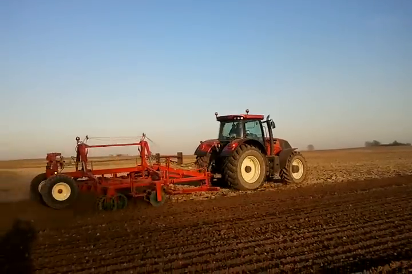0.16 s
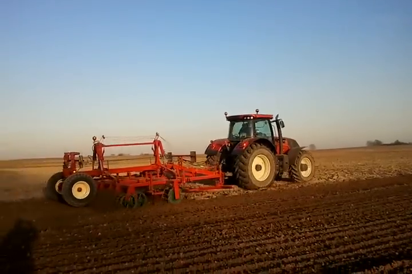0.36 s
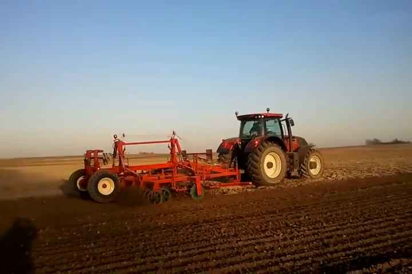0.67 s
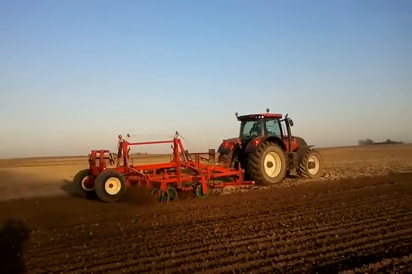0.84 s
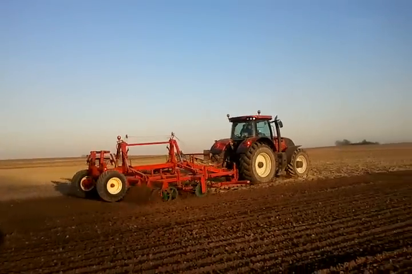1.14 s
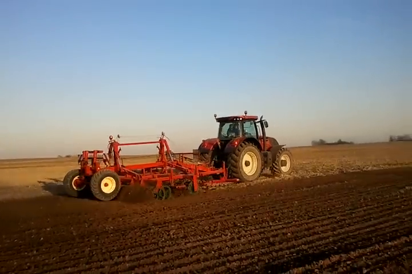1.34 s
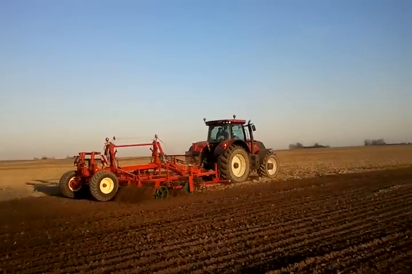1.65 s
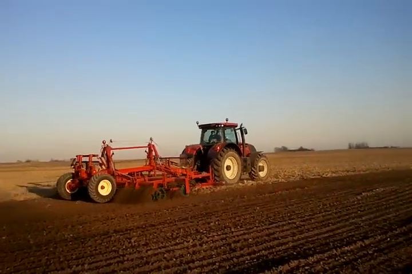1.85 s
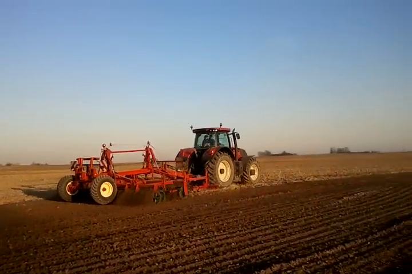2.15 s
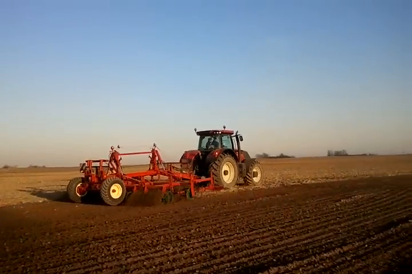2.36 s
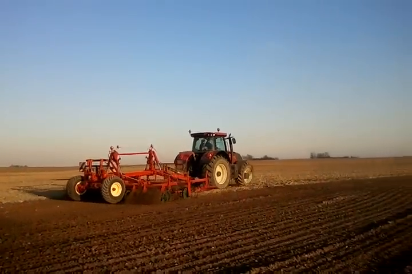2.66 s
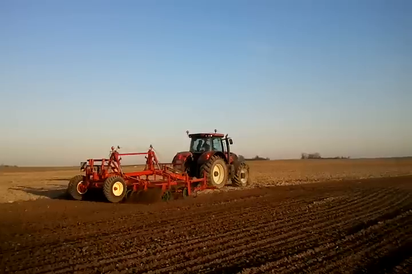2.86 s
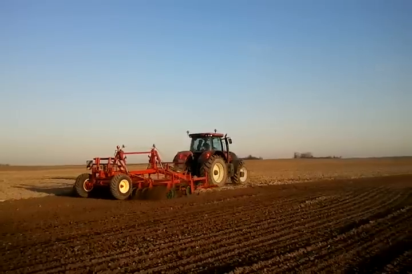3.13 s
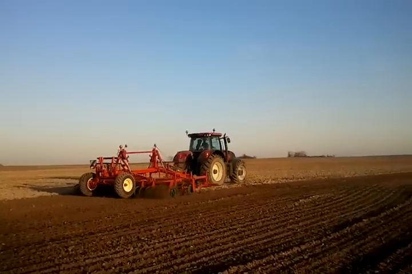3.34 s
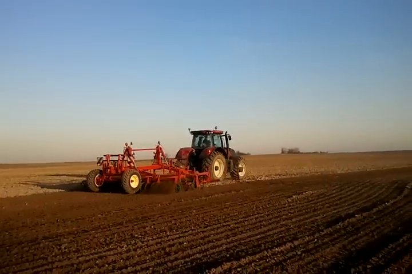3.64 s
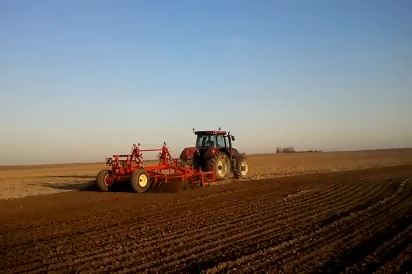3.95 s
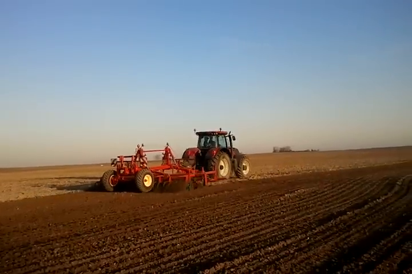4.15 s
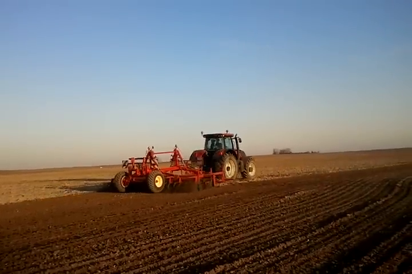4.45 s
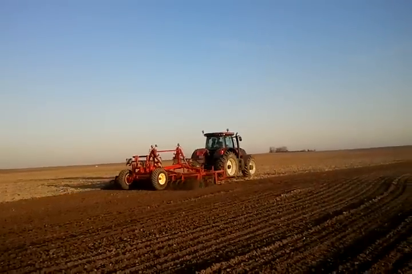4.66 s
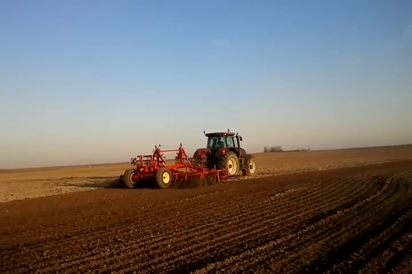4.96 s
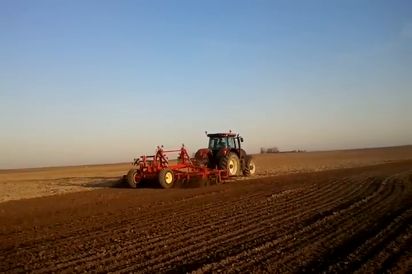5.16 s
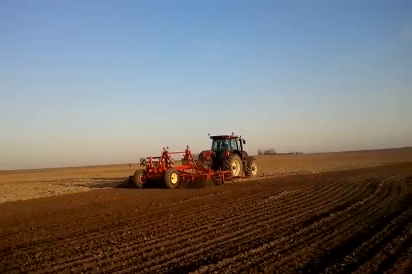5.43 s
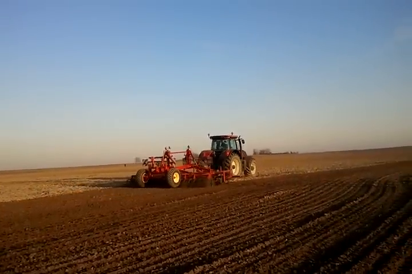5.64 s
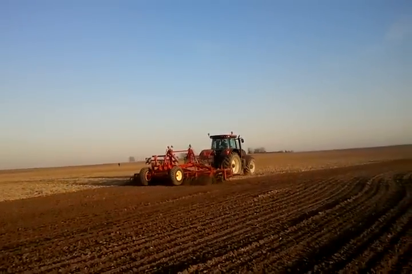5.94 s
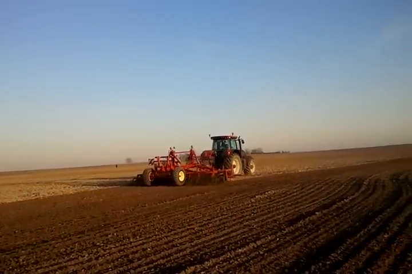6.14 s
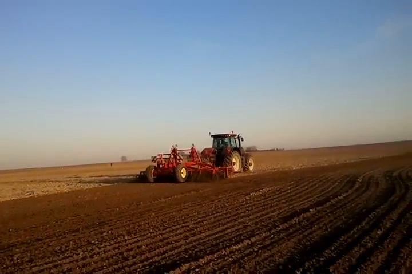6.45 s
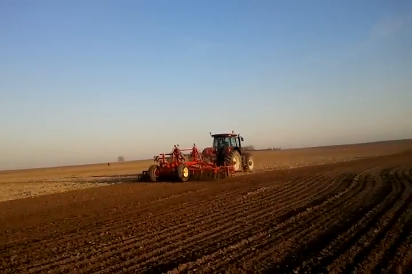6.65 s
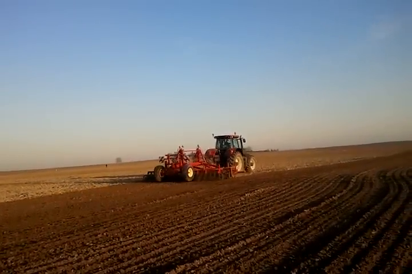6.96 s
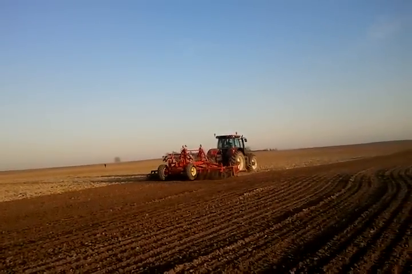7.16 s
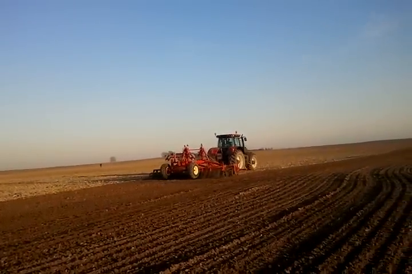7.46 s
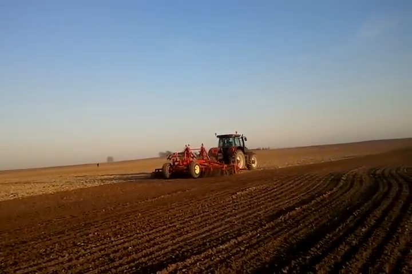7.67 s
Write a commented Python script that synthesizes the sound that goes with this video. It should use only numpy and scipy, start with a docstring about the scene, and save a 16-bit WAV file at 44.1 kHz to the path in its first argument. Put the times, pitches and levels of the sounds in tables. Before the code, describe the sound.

A diesel tractor drones and slowly moves away, dragging a clanking cultivator through soil while wind gusts buffet the microphone.

```python
"""Tractor and cultivator in wind

A six-cylinder diesel tractor drags a cultivator across a dry field and slowly draws away. Periodic
firing makes the exhaust drone and the engine knock; fan and gears hum, and the turbo whistles thinly.
Soil rushes through the tines, and impacts excite the modes of the steel frame, which clanks.
Turbulent gusts buffet the microphone and drive it into clipping."""
import sys
import numpy as np
from scipy import signal
from scipy.fft import rfft, irfft, next_fast_len
from scipy.io import wavfile
from scipy.ndimage import uniform_filter1d, map_coordinates

SR = 44100
rng = np.random.default_rng(int(sys.argv[2]) if len(sys.argv) > 2 else 0)


def master(y):
    """Save y as 16-bit WAV."""
    cut = np.clip(np.atleast_2d(y).T, -1, 1)
    pcm = np.round(cut * 32767)  # scale
    wavfile.write(sys.argv[1], SR, pcm.astype(np.int16))


N = 343970
T = np.arange(N) / SR


def undb(db):
    """Amplitude ratio of a level in decibels."""
    return 10 ** (np.asarray(db) / 20)


def unit(x):
    """Normalisation to rms 1."""
    return x / np.sqrt(np.mean(x ** 2))


def curve(table):
    """Linear interpolation of (t/s, value) points at every sample."""
    return np.interp(T, *np.transpose(table))


def colour(x, spectrum):
    """Spectral shaping by (f/Hz, level/dB) points, with a roll-off at the last point; rms 1."""
    size = next_fast_len(N)
    hz, db = np.transpose(spectrum)
    f = np.maximum(np.arange(size // 2 + 1) * SR / size, 1)
    gain = undb(np.interp(np.log(f), np.log(hz), db))
    return unit(irfft(rfft(x, size) * gain / (1 + (f / hz[-1]) ** 2), size)[:N])


def noise():
    """Gaussian white noise."""
    return rng.standard_normal(N)


def drift(rate):
    """Smooth random modulation that changes about rate times a second; rms 1."""
    steps = rng.standard_normal(4096)
    return unit(uniform_filter1d(np.interp(T * rate, np.arange(len(steps)), steps), 256))


# Gusts: t/s, duration/s, relative eddy level/dB, relative buffet level/dB
GUSTS = [(0, 0.61, -24.5, -21.5), (0.671, 0.13, -19.5, -19.5), (1.018, 0.46, -23.5, -31.5),
         (1.557, 0.31, -21.5, -27), (1.819, 0.68, -20.5, -20), (1.994, 0.203, -27.5, -17),
         (2.55, 0.24, -29.5, -37.5), (4.925, .14, -22.5, -31), (5.069, 0.12, -18.5, -25.5),
         (5.704, .14, -23, -32.5), (6.22, .24, -18.5, -31), (6.623, 0.057, -22.5, -31),
         (6.98, 0.37, -28.5, -35), (7.388, 0.23, -20.5, -28), (7.73, .07, -24.5, -36)]

def gusts(attack_s=0.031, release_s=0.017):
    """Envelopes of eddies and buffeting: each gust grows exponentially, holds and decays."""
    slow, fast = undb(-33.5), undb(-40)  # the breeze between gusts
    for s, length, slow_db, fast_db in GUSTS:
        shape = np.exp(np.minimum(T - s, 0) / attack_s - np.maximum(T - s - length, 0) / release_s)
        slow = np.maximum(slow, undb(slow_db) * shape)
        fast = np.maximum(fast, undb(fast_db) * shape)
    return slow, fast


def turbulence(spectrum, steady_s=0.075):
    """Turbulent pressure: shaped noise whose strength is even over the span of one eddy."""
    swirl = colour(noise(), spectrum)
    return swirl / np.sqrt(uniform_filter1d(swirl ** 2, int(steady_s * SR)))


# Single eddies striking the microphone: t/s, envelope peak level/dB, f/Hz
THUMPS = [(.886, -1.5, 153), (1.59, -6, 205), (1.827, -2, 110), (2.109, 2.5, 91), (2.477, 4.5, 100),
          (3.15, -20, 198), (3.302, -19, 310), (4.757, -9, 109), (5.1, -5, 202), (5.147, -0.5, 115),
          (6.305, -7, 150), (6.442, -14, 128), (6.489, -6, 133), (7.343, -10, 128), (7.413, -10.5, 250),
          (7.433, -7, 240), (7.494, -4, 160), (7.517, -2, 143), (7.588, -3, 149), (7.68, -9.5, 253)]

def thumps(cycles=0.76, steepness=0.51):
    """Pressure transients: a small eddy pushes and pulls the diaphragm, with a steep front."""
    out = np.zeros(N)
    for s, db, hz in THUMPS:
        near = np.abs(T - s) < .05
        turns = (T[near] - s) * hz
        angle = 2 * np.pi * (turns + rng.random())
        envelope = undb(db) * np.exp(-(turns / cycles) ** 2)
        out[near] += envelope * np.sin(angle + steepness * np.sin(angle))
    return out


# Spectra of slow eddies and of fast buffeting: f/Hz, relative level/dB
EDDIES = [(5, -12.5), (15, -3), (35, -4), (60, 0), (100, -3.5), (160, -21), (300, -42)]
BUFFETS = [(20, -17), (60, 0.5), (100, 2), (170, -1.5), (235, -6.5), (320, -12.5), (450, -24), (700, -29.5),
           (1500, -56)]

def wind(eddy_db=4.0, buffet_db=10, onset_db=-36):
    """Flow noise: slow eddies rock the diaphragm; a stronger flow breaks up and buffets it."""
    slow, fast = gusts()
    breakup = 1 / (1 + (undb(onset_db) / fast) ** 2)
    buffets = breakup * fast * undb(buffet_db + 2 * drift(60)) * turbulence(BUFFETS)
    eddies = slow * undb(eddy_db + 2 * drift(12)) * turbulence(EDDIES)
    return eddies + buffets + thumps()


# Stones striking a spring tine: t/s, peak level/dB, f/Hz, T60/s
PINGS = [(3.563, -22, 6970, 0.023), (5.025, -21, 2970, 0.052), (5.119, -18, 4180, .1),
         (5.156, -31, 4170, 0.14), (5.4157, -18.5, 2450, 0.063), (6.294, -21.5, 1115, 0.07),
         (7.019, -17, 3230, 0.044), (7.3752, -25, 2510, 0.12)]

def pings():
    """Damped free vibration: a flicked tine rings in one mode, which the soil quickly absorbs."""
    out = np.zeros(N)
    for s, db, hz, t60 in PINGS:
        ringing = (T >= s) & (T < s + t60)
        t = T[ringing] - s
        out[ringing] += undb(db) * np.sin(2 * np.pi * hz * t) * np.exp(-np.log(1000) * t / t60)
    return out


# Blows on the frame: t/s, relative level/dB, contact centre f/Hz, T60 of the crash/s
CLANKS = [(0.5333, -9.5, 2710, 0.046), (0.597, -4, 2530, 0.072), (0.608, -14.5, 3500, 0.12),
          (1.578, -12.5, 2310, 0.057), (1.6183, -16.5, 2070, 0.059), (1.69, -14.5, 2080, 0.1),
          (1.727, -18.5, 1710, 0.097), (2.2235, -19, 2580, 0.045), (2.342, -24.5, 3150, 0.088),
          (3.31, -21, 2000, 0.039), (4.0852, -24.5, 3600, 0.038), (4.263, -22.5, 1100, 0.12),
          (4.799, -21.5, 2300, 0.047), (4.839, -21, 2260, 0.042), (4.9086, -23.5, 1870, 0.12),
          (4.9352, -25.5, 2570, .2), (5.12, -20.5, 3600, 0.067), (5.1498, -18, 3000, 0.063),
          (5.4151, -20.5, 2291, 0.083), (6.03, -32, 4330, 0.12), (6.291, -29, 2820, 0.1),
          (6.561, -26, 1970, .08), (6.779, -24.5, 1790, 0.061), (7.019, -22, 2340, 0.065),
          (7.3749, -25, 2670, 0.055)]
# Modes of the steel frame: f/Hz, relative level/dB
FRAME_MODES = [(930, 2.5), (1206, -2.5), (1610, 1.5), (2160, 1), (2345, 1), (2590, 0.5), (2790, 2.5),
               (3010, 4), (3335, 4.5), (3410, 1.5), (3560, -7.5), (3775, 1), (4014, -4.5), (4242, -9),
               (4737, -10.5), (5500, -12), (5992, -6), (6918, -10), (7181, -6.5), (7900, -9)]

def clanks(ring_db=-6.0, crash_db=-0.5, ring_stretch=1.88, detune=0.01):
    """Impact excitation: a dense crash and longer-lived modes, coloured by the contact's hardness."""
    size = 16384
    out, t = np.zeros(N + size), np.arange(size) / SR
    f = np.maximum(np.arange(size // 2 + 1) * SR / size, 1)
    mode_hz, mode_db = np.transpose(FRAME_MODES)
    for s, db, hz, t60 in CLANKS:
        contact = (1 + np.log2(f / hz) ** 2) ** -2
        phase, shift = rng.random((2, len(FRAME_MODES), 1))
        turns = mode_hz[:, None] * (1 + detune * (shift - .5)) * t + phase
        modes = undb(mode_db) @ np.sin(2 * np.pi * turns)
        ring, crash = (unit(irfft(rfft(v) * contact)) for v in (modes, rng.standard_normal(size)))
        decay = -np.log(1000) * t / t60
        blow = undb(ring_db) * ring * np.exp(decay / ring_stretch)
        blow += undb(crash_db) * crash * np.exp(decay)
        attack_s = 0.00021 / undb(0.46 * db)  # gentle blows scrape in more slowly
        start = int(s * SR)
        out[start:start + size] += undb(db) * blow * (1 - np.exp(-t / attack_s))
    return out[:N]


# Spectrum of crumbling soil: f/Hz, relative level/dB
SOIL = [(300, -11.5), (900, 1.5), (2000, 3.5), (3300, -0.5), (4500, -4.5), (7000, -18), (9000, -15.5)]

def soil(clods_per_s=90, spread_db=5.5, crumble_s=0.0075, ring_db=-5, ring_s=.02):
    """Shot noise: clods burst on the tines at random and keep the frame's modes faintly ringing."""
    sizes = undb(spread_db * np.minimum(rng.exponential(size=N), 3))
    clods = (rng.random(N) < clods_per_s / SR) * sizes
    power = signal.lfilter([1], [1, -np.exp(-1 / (crumble_s * SR))], clods ** 2)
    crunch = colour(noise() * np.sqrt(power), SOIL)
    t = T[:SR // 10]
    frame = sum(undb(db) * np.sin(2 * np.pi * hz * t) for hz, db in FRAME_MODES) * np.exp(-t / ring_s)
    return crunch + undb(ring_db) * unit(signal.fftconvolve(crunch, frame)[:N])


def spreading_loss(speed_m_s=3.44, nearest_m=9.93, passed_ago_s=0.64):
    """Spherical spreading from a source receding in a straight line: loss in dB since the start."""
    metres = np.hypot(nearest_m, speed_m_s * (T + passed_ago_s))
    return 20 * np.log10(metres / metres[0])


# Drag of the tines: t/s, engine load as a fraction of full load
LOAD = [(0, .38), (.6, .46), (1.35, .96), (2.15, .99), (3.6, 0), (4.5, .15), (4.8, .87), (6.2, .1),
        (7.8, .7)]

def received(level_db, loss_scale, full_load_db):
    """Gains add in decibels: a base level, less a multiple of the spreading loss, plus a load term."""
    return undb(level_db - loss_scale * spreading_loss() + full_load_db * curve(LOAD))


def turbo(no_load_hz=7072, rise_hz=228):
    """Frequency modulation: the turbocharger's thin whistle rises and falls with the load."""
    turns = np.cumsum(no_load_hz + rise_hz * curve(LOAD)) / SR
    return np.sqrt(2) * undb(2 * drift(8.8)) * np.sin(2 * np.pi * turns + 0.94 * drift(27))


# Gear whine, loudest side-on: t/s, level/dB
WHINE = [(0, -26), (.4, -33.5), (1.1, -39.5), (2.6, -36), (3.6, -51), (5.7, -52), (7.8, -41)]

def transmission(firings, runout=0.71):
    """Amplitude modulation: a wheel slightly off centre adds sidebands to the gear-mesh tone."""
    mesh = np.sin(2 * np.pi * 7.69 * firings + 0.15 * drift(18))
    wheel = np.cos(2 * np.pi * 5 / 6 * firings + drift(9))
    return unit(mesh * (1 + runout * wheel)) * undb(curve(WHINE) - drift(5.4))


# Fan tones: harmonic number, relative level/dB, phase wander/rad, extra multiple of the spreading loss
FAN_TONES = [(1, 2.5, 0.2, 0), (2, -3.5, 0.89, 0.3), (3, -7, 0.6, -0.5)]

def fan(firings, blades_per_firing=6.225, waver_db=3.1):
    """Blade-passing harmonics: the fan chops the air, and its tones waver on crossing the field."""
    passes, loss_db = blades_per_firing * firings, spreading_loss()
    tones = np.zeros(N)
    for k, db, wander, loss_scale in FAN_TONES:
        gain = undb(db - loss_scale * loss_db + waver_db * drift(5.4))
        tones += gain * np.sin(2 * np.pi * k * passes + wander * drift(16))
    return unit(tones)


# Tones of belt drives, pumps and block: f/firing rate, relative level/dB, phase wander/rad
HUM = [(6.71, -17, 0.77), (8.05, -10, 0.69), (8.39, -11.5, 1), (9.01, -14, 0.59), (10.19, -17, 0.41),
       (15.75, -15, 0.82), (25.7, -24.5, 1)]
# Rumble spectrum of block and tyres: f/Hz, relative level/dB
RUMBLE_SPECTRUM = [(30, -13), (70, 2), (120, 13), (185, 12.5), (225, -1.5), (275, -7.5), (390, 3), (500, 3),
                   (600, 5), (750, -9), (1000, -3), (1500, -31), (3000, -34)]

def machinery(firings, waver_db=3.5, hum_db=-0.5, rumble_db=3.5):
    """Lines on a continuous spectrum: accessory tones, shaken by moving air, over a low rumble."""
    hum = np.zeros(N)
    for k, db, wander in HUM:
        gain = undb(db + waver_db * drift(5))
        hum += gain * np.sin(2 * np.pi * k * firings + wander * drift(14))
    return undb(hum_db) * hum + undb(rumble_db) * colour(noise(), RUMBLE_SPECTRUM)


# Spectrum of combustion knock: f/Hz, relative level/dB
KNOCK_SPECTRUM = [(300, -17), (700, -3.5), (1000, -3), (1500, -4), (2100, 1), (2700, 0), (3450, -2.5),
                  (3750, -8), (5000, -12), (6300, -12.5), (7100, -16), (9000, -16)]

def knock(firings, depth=0.28, decay_firings=0.22, uneven=0.53, rattle_gain=0.69):
    """Cyclostationary noise: a burst at each firing; valves and injectors repeat every two turns."""
    cylinders = 1 + uneven * (np.cos(np.pi * firings) + np.cos(2 * np.pi * firings / 3))
    bursts = 1 + depth * cylinders * np.exp(-(firings % 1) / decay_firings)
    pattern = rng.standard_normal(3480)  # one engine cycle of six firings
    rattle = map_coordinates(pattern, [firings / 6 % 1 * len(pattern)], order=1, mode="wrap")
    excitation = (noise() + rattle_gain * unit(rattle)) * bursts
    return colour(excitation, KNOCK_SPECTRUM) * undb(0.18 * drift(8.5))


# The engine picks up, then holds its speed: t/s, firing rate f/Hz
FIRING_RATE = [(0, 74.53), (1, 74.75), (2, 76.18), (7.8, 76.5)]

def crank(hunt_hz=1.3, swing_hz=0.555, crest_s=4.9):
    """Phase as the integral of frequency: firings since the start, while the governor hunts."""
    hunt = swing_hz * np.cos(2 * np.pi * hunt_hz * (T - crest_s))
    return np.cumsum(curve(FIRING_RATE) + hunt) / SR


# Exhaust lines: f/firing rate, relative level/dB
EXHAUST = [(1, 0), (1.5, -10.5), (2, -8.5), (7 / 3, -22), (2.5, -16.5), (4, -33), (4.5, -28), (5, -32)]

def exhaust(firings, throb_db=0.5, waver_db=2.0):
    """Fourier series of the silencer's pulses: unequal cylinders add lines between the harmonics."""
    pulses = np.zeros(N)
    for k, db in EXHAUST:
        gain = undb(db + waver_db * (k > 1) * drift(2))  # only the overtones waver
        pulses += gain * np.cos(2 * np.pi * k * firings)
    return unit(pulses) * undb(-throb_db * drift(25))


def scene():
    """Superposition in a free field: tractor, cultivator and wind, with no walls to echo them."""
    firings = crank()
    tractor = received(-18, loss_scale=0.72, full_load_db=1.5) * exhaust(firings)
    tractor += received(-33, loss_scale=0.63, full_load_db=-3.3) * fan(firings)
    tractor += received(-50.5, loss_scale=1.9, full_load_db=2.5) * turbo()
    tractor += transmission(firings)
    tractor += received(-30.5, loss_scale=0.83, full_load_db=1.2) * machinery(firings)
    tractor += received(-25, loss_scale=1.19, full_load_db=0.77) * knock(firings)
    cultivator = received(-34.5, loss_scale=0.61, full_load_db=1.2) * soil() + clanks() + pings()
    return (tractor + cultivator + wind())[None]


def record(dry):
    """Band limiting and saturation: a microphone with little treble rounds off the loudest peaks."""
    treble_hz, ceiling, top_hz = 7600, .71, 15800
    heard = signal.sosfilt(signal.butter(14, treble_hz, fs=SR, output="sos"), dry)
    clipped = heard / (1 + (heard / ceiling) ** 16) ** (1 / 16)
    return signal.sosfilt(signal.ellip(8, .2, 70, top_hz, fs=SR, output="sos"), clipped)


dry = scene()
out = record(dry)
master(out)
```